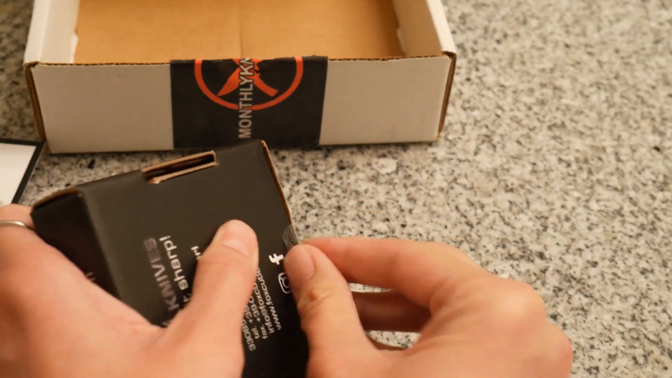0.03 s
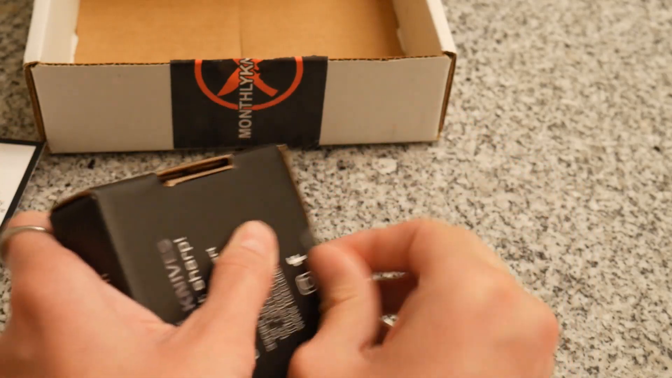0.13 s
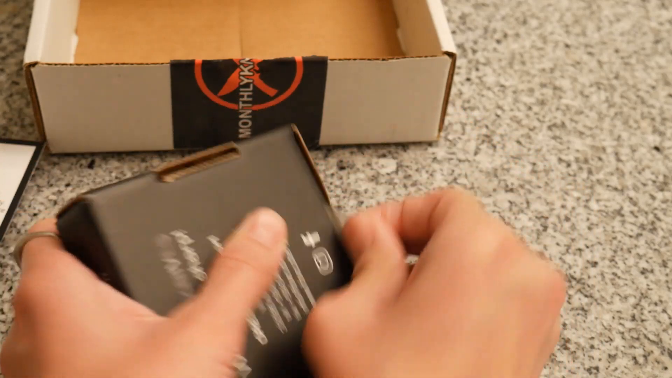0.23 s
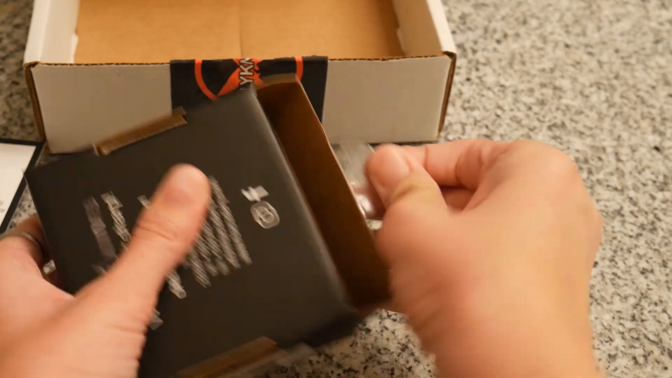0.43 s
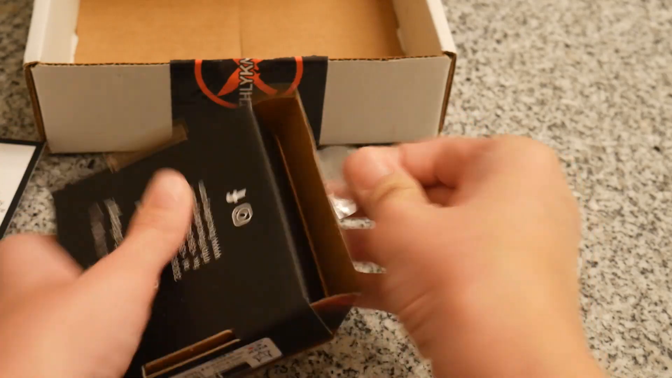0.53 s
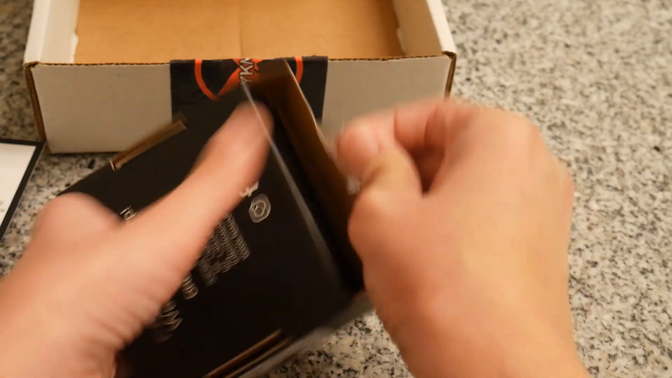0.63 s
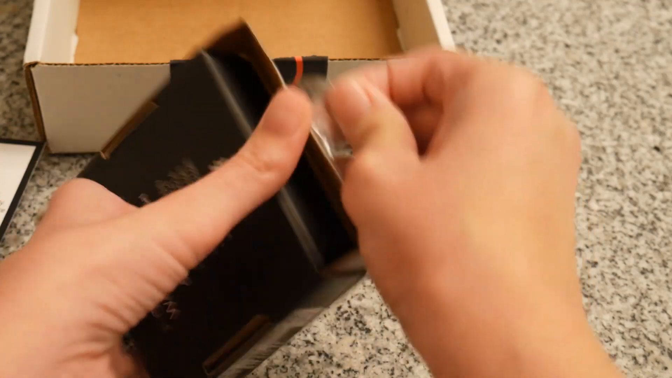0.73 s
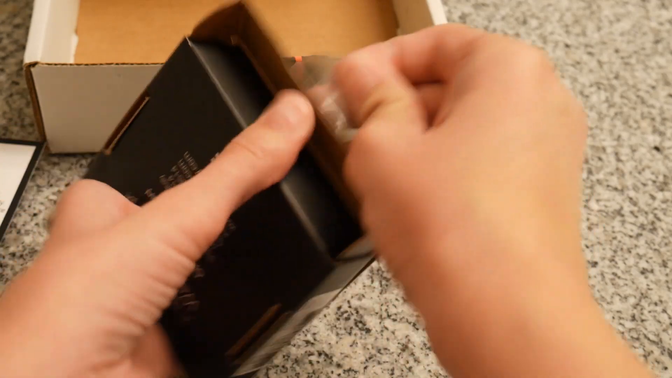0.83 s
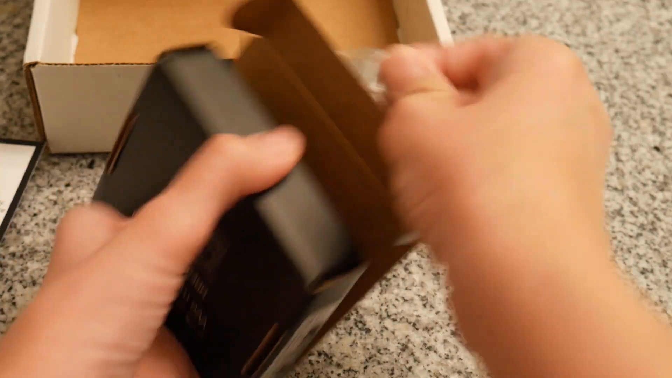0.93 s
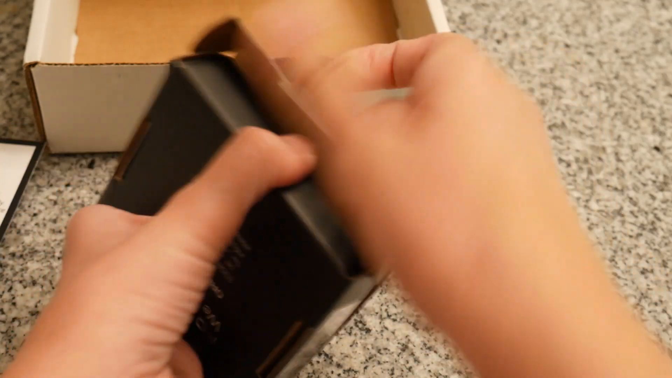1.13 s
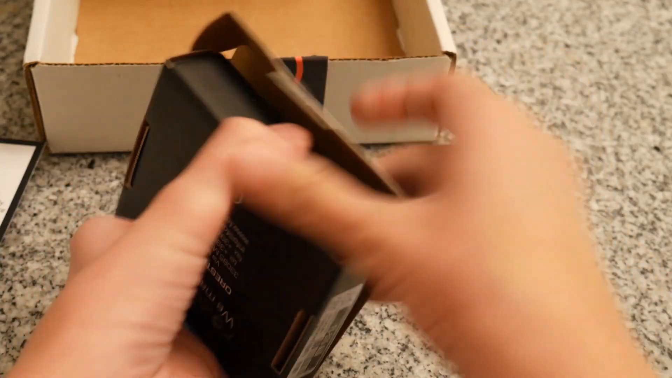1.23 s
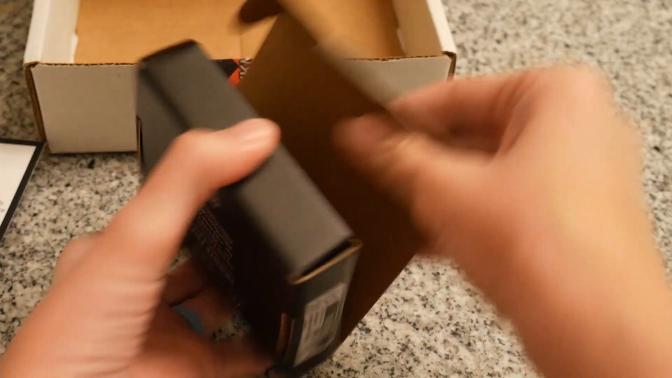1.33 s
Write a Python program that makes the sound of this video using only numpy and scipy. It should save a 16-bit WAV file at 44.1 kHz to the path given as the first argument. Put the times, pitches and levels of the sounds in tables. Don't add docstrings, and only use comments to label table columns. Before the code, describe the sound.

Hands work open a stiff cardboard box, skin hissing and squeaking on card, tabs popping, panels knocking and creaking, finally the flap snapping free and dragging along the edge; close stereo pickup, short indoor echoes.

```python
import sys
import numpy as np
from scipy import signal
from scipy.io import wavfile
from scipy.ndimage import uniform_filter1d, minimum_filter1d

SR = 44100
rng = np.random.default_rng(int(sys.argv[2]) if len(sys.argv) > 2 else 0)


def pcm_store(signal):
    levels = np.round(np.clip(np.atleast_2d(signal), -1, 1) * 32767)
    wavfile.write(sys.argv[1], SR, levels.astype(np.int16).T)


def amplitude_ratio(level_db):
    exponent = np.asarray(level_db, float) / 20
    return 10 ** exponent


N = 61740
FLAP_OPENS_S = 1.03

# f/Hz, level/dB
AIR_COLOUR = [(18, -56), (30, 11), (194, 14.5), (554, 6.5), (913, 13), (1250, 0), (2290, 11), (12000, -19),
              (16000, -1.5)]
# f/Hz, likeness/0-1
AIR_LIKENESS = [(30, .1), (120, 0.066), (500, 0.067), (8000, 0.44)]
# t/s, level/dB
RUMBLE_LEVEL = [(0, -92), (.3, -72), (.4, -60.5), (.5, -60), (.6, -61), (.75, -60.5), (.9, -89),
                (1.05, -64), (1.24, -89), (1.28, -55.5), (1.4, -70)]
# t/s, level/dB
SLIDE_LEVEL = [(0, -68.5), (.08, -77.5), (.11, -55.5), (.16, -55.5), (.22, -56.5), (.44, -52.5), (.49, -58),
               (.76, -57.5), (.8, -54.5), (.88, -74), (.94, -61), (1.12, -64), (1.16, -53.5), (1.205, -58),
               (1.24, -46.5), (1.3, -51), (1.4, -51)]
# f/Hz, level/dB
SLIDE_COLOUR = [(880, -23), (1500, -4), (2300, -10), (4460, -6), (9280, -7), (14900, -21), (16000, -47)]
# t/s, length/s, f/Hz, level/dB
SQUEAKS = [(0, 0.044, 1650, -56), (.01, 0.049, 2300, -55), (0, 0.022, 3000, -64), (0.089, 0.055, 2240, -61),
           (0.099, 0.063, 2920, -55.5), (0.115, 0.031, 1600, -64), (0.127, .035, 2140, -58),
           (0.167, 0.036, 2300, -47), (.165, 0.043, 904, -58), (.17, 0.032, 1600, -61),
           (0.173, 0.034, 3160, -57), (0.238, 0.066, 954, -58), (.3, 0.15, 930, -50),
           (1.14, 0.073, 1180, -55), (1.2, 0.072, 1164, -50.5), (1.2, 0.085, 1460, -51.5)]
# t/s, level/dB
CREAK_LEVEL = [(0, -45), (.04, -58), (.05, -81), (.09, -70), (.12, -51.5), (.19, -48), (.22, -49.5),
               (.45, -43.5), (.72, -42.5), (.84, -37.5), (.87, -51.5), (1.02, -44.5), (1.13, -78),
               (1.15, -52), (1.19, -67.5), (1.23, -53.5), (1.28, -53), (1.4, -56.5)]
# f/Hz, width/Hz, level/dB, change once the flap is open/dB
PANELS = [(296, 340, -1, 12), (930, 88, 1, 3.5), (1180, 190, 1.5, 7), (1400, 180, -3.5, -14),
          (1580, 330, 2, 6), (2300, 130, -2.5, 10), (2860, 780, 3, -2), (3800, 2700, 1.5, 11.5)]
# t/s, peak level/dB, air pitch f/Hz
THUDS = [(0.237, -50, 380), (0.298, -34, 269), (.314, -38.5, 310), (.325, -41.5, 241), (.345, -41.5, 478),
         (.362, -54, 342), (0.46, -48, 310), (0.489, -38.5, 334), (0.528, -41.5, 304), (0.616, -28, 307),
         (.626, -36, 282), (.636, -36, 410), (0.647, -35.5, 293), (.655, -37, 370), (.672, -48, 257),
         (.682, -38, 322), (0.714, -35.5, 298), (.722, -34, 284), (0.728, -30.5, 385), (.752, -32, 344),
         (0.757, -46, 353), (.768, -37, 340), (.787, -38, 410), (0.802, -51, 317), (0.832, -35, 344),
         (0.854, -40, 314), (0.862, -44, 348), (0.885, -45, 347), (0.924, -46, 464), (0.957, -40, 255),
         (1.031, -28.5, 460), (1.032, -29, 632), (1.035, -33, 247), (1.05, -34, 600), (1.114, -50, 248),
         (1.136, -48, 322), (1.229, -44, 353), (1.273, -44, 264), (1.321, -49, 331), (1.337, -44, 357),
         (1.368, -46, 343)]
# t/s, length/s, peak level/dB
SCUFFS = [(0.2383, 0.0029, -17.5), (0.7807, 0.0034, -31), (0.7864, 0.0059, -24), (0.794, 0.0079, -41),
          (.818, .005, -40), (0.825, 0.0056, -30), (0.924, .004, -57), (0.951, 0.026, -37.5),
          (1.021, .012, -23), (1.031, 0.0023, -12.5), (1.046, 0.0033, -19.5)]
# t/s, peak level/dB, panel f/Hz
KNOCKS = [(0.24, -32.5, 881), (0.297, -22.5, 1180), (0.306, -34.5, 885), (.318, -34, 910),
          (.33, -44.5, 909), (.343, -40.5, 630), (.355, -34.5, 930), (.368, -36.5, 900),
          (0.53, -30.5, 1014), (0.684, -25.5, 1181), (0.724, -37, 869), (0.731, -33, 1146),
          (0.784, -33, 1693), (0.954, -40.5, 1226), (0.987, -34.5, 1023), (1.021, -33, 1280),
          (1.0325, -24, 1062), (1.043, -21, 1380), (1.045, -33, 2750), (1.056, -29, 1454),
          (1.059, -30.5, 2714), (1.075, -34, 2300), (1.141, -38, 1296), (1.219, -40.5, 1144),
          (1.263, -39, 1343)]
# t/s, peak level/dB, ring f/Hz, ring width/Hz, brightness/dB
SNAPS = [
    (0.2408, -20.5, 3650, 1520, 7.5),
    (.2968, -2.5, 5240, 3340, -3.5),
    (0.5109, -19, 4150, 1780, -16),
    (0.5311, -13, 3770, 1360, 1.5),
    (.652, -18.5, 5970, 3000, -2),
    (0.6761, -17.5, 4930, 1810, 0),
    (0.686, -11, 6360, 2780, -40),
    (.988, -5.5, 4780, 2490, -11),
]
# t/s, level/dB
FLICKS = [
    (.2968, -11.5),
    (.652, -24),
    (.6762, -25.5),
    (.685, -17.5),
    (.701, -29),
]
# t/s, level/dB, f/Hz, width/Hz
POP = (.2968, 4.6, 2200, 1600)
# t/s, level/dB
DRAG_LEVEL = [(1.03, -68), (1.05, -33.5), (1.09, -53), (1.125, -60), (1.145, -44.5), (1.185, -47.5),
              (1.21, -53), (1.24, -48), (1.28, -54), (1.31, -67), (1.4, -69)]
# f/Hz, t60/s
ROOM_T60 = [(200, 1), (1400, 0.19), (3700, 0.27), (9700, 0.24), (15000, 0.1)]
# delay t/s, level/dB
ECHOES = [(.0032, -9.5), (.0085, -12.5), (0.0095, -19), (0.019, -24)]
# f/Hz, likeness/0-1
ROOM_LIKENESS = [(100, 0.1), (300, 0.4), (1000, 0.44), (4000, 0.82), (12000, 0.6)]


def rms_one(x):
    return x / np.sqrt(np.mean(x ** 2) + 1e-20)


def in_time(rows):
    s, db = np.transpose(rows)
    return np.interp(np.arange(N) / SR, s, db)


def at_hz(points, hz):
    curve_hz, value = np.transpose(points)
    return np.interp(np.log(hz), np.log(curve_hz), value)


def drift(rate_hz):
    r = np.exp(-2 * np.pi * rate_hz / SR)
    settle = 9000
    white = rng.standard_normal(N + settle)
    return rms_one(signal.lfilter([1], [1, -2 * r, r * r], white)[settle:])


def resonate(x, hz, width_hz):
    r = np.exp(-np.pi * width_hz / SR)
    poles = [1, -2 * r * np.cos(2 * np.pi * hz / SR), r * r]
    return signal.lfilter([(1 - r * r) / 2, 0, (r * r - 1) / 2], poles, x)


def bands(likeness, shape):
    out = 0
    edges = 30 * 2 ** np.arange(0, 9.6, .5)
    white = rng.standard_normal((2, 2, N))
    for k, (low, high) in enumerate(zip(edges, edges[1:])):
        centre = np.sqrt(low * high)
        band = signal.butter(2, [low, high], "band", fs=SR, output="sos")
        mid, side = signal.sosfilt(band, white[k % 2])
        alike = np.clip(at_hz(likeness, centre), 0, 1)
        stereo = np.sqrt(1 + alike) * mid + np.sqrt(1 - alike) * side * [[1], [-1]]
        out = out + shape(centre) * stereo
    return out


def grains(per_s, spread_db, size):
    chance, strength, sign = rng.random((3, size))
    fires = chance < per_s / SR
    return fires * amplitude_ratio(-spread_db * np.log(strength + 0.0039)) * np.sign(sign - .5)


def add(out, s, sound):
    start = int(s * SR)
    out[..., start:start + sound.shape[-1]] += sound[..., :N - start]


def air():
    tone = rms_one(bands(AIR_LIKENESS, lambda hz: amplitude_ratio(at_hz(AIR_COLOUR, hz))))
    white = rng.standard_normal((2, N))
    shake = white[0] + .5 * white[1] * [[1], [-1]]
    rumble_hz = 117.7
    rumble = resonate(resonate(shake, rumble_hz, 11), rumble_hz, 75)
    return amplitude_ratio(-58) * tone + amplitude_ratio(in_time(RUMBLE_LEVEL)) * rms_one(rumble)


def slide():
    def colour(hz):
        return amplitude_ratio(at_hz(SLIDE_COLOUR, hz) - 40 * (hz < 1200) + 1.27 * drift(46))

    return amplitude_ratio(5 + in_time(SLIDE_LEVEL)) * rms_one(bands(ROOM_LIKENESS, colour))


def squeaks():
    width_hz = 69
    out, t = np.zeros(N), np.arange(6000) / SR
    for s, length_s, hz, db in SQUEAKS:
        grit = rng.standard_normal(len(t))
        tone = rms_one(resonate(resonate(grit, hz, width_hz), hz, 3 * width_hz))
        swell = np.sin(np.pi * np.clip(.1 + 0.82 * t / length_s, 0, 1))
        add(out, s, amplitude_ratio(db) * tone * swell)
    return out


def creak():
    clicks_per_s = 730 * amplitude_ratio(3.0 * drift(46))
    clicks = grains(clicks_per_s, spread_db=4.5, size=N)
    is_open = np.arange(N) > FLAP_OPENS_S * SR
    body = 0
    for k, (hz, width, db, open_db) in enumerate(PANELS):
        ring = resonate(resonate(clicks, hz, width), hz, 3 * width) * np.sqrt(200 / width)
        body = body + (-1) ** k * amplitude_ratio(db + open_db * is_open) * ring
    return amplitude_ratio(-3.5 + in_time(CREAK_LEVEL)) * rms_one(body)


def thuds():
    push_s, width_hz, second_mode = 0.006, 79, 1.92
    out, t = np.zeros(N), np.arange(3000) / SR
    push = np.sin(np.pi * np.minimum(t / push_s, 1)) ** 2
    for s, db, hz in THUDS:
        lump = rng.standard_normal(len(t))
        force = (1 + lump) * push * np.sin(2 * np.pi * hz * t)
        second = resonate(push * lump * 5.2, hz * second_mode, width_hz)
        rings = resonate(force, hz, width_hz) + amplitude_ratio(-10) * second
        add(out, s, amplitude_ratio(db) * rings / np.abs(rings).max())
    return out


def scuffs():
    rise_s = 0.00088
    out, t = np.zeros(N), np.arange(3000) / SR
    for s, length_s, db in SCUFFS:
        shape = np.exp(-t / length_s) * (1 - np.exp(-t / rise_s))
        force = grains(20000, spread_db=3.6, size=len(t)) * shape
        bright = resonate(force, 3200, 5100) + 0.5 * resonate(force, 9600, 3500)
        add(out, s, amplitude_ratio(db) * resonate(bright, 4200, 7200))
    return out


def knocks():
    fade_s, rise_s, width_hz, second_mode = 0.0054, 0.0004, 554, 1.963
    out, t = np.zeros(N), np.arange(3000) / SR
    shape = np.exp(-t / fade_s) * (1 - np.exp(-t / rise_s))
    for s, db, hz in KNOCKS:
        grit = rng.standard_normal(len(t))
        force = (grit + 0.3 * np.sin(2 * np.pi * hz * t)) * shape
        first = resonate(resonate(force, hz, width_hz), hz, 640)
        second = resonate(force, hz * second_mode, 1.07 * width_hz)
        rings = first - amplitude_ratio(-2.5) * second
        add(out, s, amplitude_ratio(db + 2) * rings / np.abs(rings).max())
    return out


def crack(rings):
    cluster_s, wait_s = 0.0033, 0.00079
    t = np.arange(900) / SR
    reflections = amplitude_ratio(-4 - 28 * t / cluster_s) * rng.standard_normal(len(t)) * (t < cluster_s) * (t > wait_s)
    force = reflections * [[1], [0]]
    force[:, 0] = 1
    out = 0
    for hz, width, db in rings:
        ring = resonate(resonate(force, hz, width), hz, 2.34 * width)
        energy = np.sum(ring ** 2, axis=1, keepdims=True)
        out = out + amplitude_ratio(db) * ring / np.sqrt(energy / 20)
    return out


def snaps():
    top_hz, top_width_hz = 8950, 5200
    out = np.zeros((2, N))
    for s, db, hz, width, top_db in SNAPS:
        add(out, s, crack([(hz, width, db), (top_hz, top_width_hz, db + top_db)]))
    for s, db in FLICKS:
        add(out, s, crack([(3000, 570, db)]))
    return out


def pop():
    s, db, hz, width = POP
    click = 1. * (np.arange(N) == int(s * SR))
    return amplitude_ratio(db) * resonate(resonate(click, hz, width), hz, 2 * width)


def drag():
    clicks = grains(6000, spread_db=2.5, size=N)
    low = resonate(resonate(clicks, 1150, 270), 1500, 580)
    middle = resonate(resonate(clicks, 2140, 690), 1950, 1700)
    high = resonate(resonate(clicks, 2900, 400), 2760, 1200)
    ridge = low - 0.43 * middle + 0.25 * high
    return amplitude_ratio(in_time(DRAG_LEVEL) + 1.1 * drift(28)) * rms_one(ridge)


def room(x):
    build_s = 0.0056
    t = np.arange(N) / SR
    tail = bands(ROOM_LIKENESS, lambda hz: amplitude_ratio(-60 * t / at_hz(ROOM_T60, hz)))
    tail = tail * (1 - np.exp(-(t / build_s) ** 2))
    response = amplitude_ratio(-3.5) * tail / np.sqrt(np.sum(tail ** 2) / 2)
    for delay_s, db in ECHOES:
        smear = rng.standard_normal((2, 120)) * np.exp(-np.arange(120) / 40)
        echo = (smear[0] + 0.6 * smear[1] * [[1], [-1]]) / np.sqrt(20)
        add(response, delay_s, amplitude_ratio(db) * echo)
    return signal.fftconvolve(response, x[None], axes=1)[:, :N]


def scene():
    still = air() + slide()
    box = creak() + scuffs() + knocks() + drag()
    thump = thuds()
    near, far = snaps()
    walls = room(far + box + amplitude_ratio(-11) * thump)
    return near + pop() + box + thump + walls + still + squeaks()


def limit(x):
    gain = np.minimum(1, .84 / (np.abs(x).max(axis=0) + 1e-9))
    return x * uniform_filter1d(minimum_filter1d(gain, size=61), size=31)


def band_limit(x):
    return signal.sosfilt(signal.butter(12, 16660, fs=SR, output="sos"), x)


def record(dry):
    low_cut = signal.butter(1, 61, "high", fs=SR, output="sos")
    top_cut = signal.cheby2(10, 60, 16600, fs=SR, output="sos")
    soft = signal.sosfilt(low_cut, limit(dry))
    return band_limit(signal.sosfilt(top_cut, soft))


dry = scene()
out = record(dry)
pcm_store(out)
```